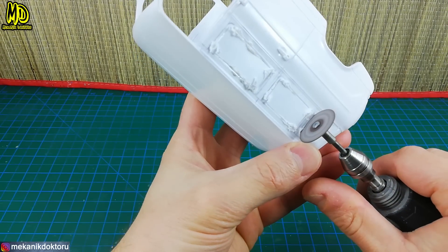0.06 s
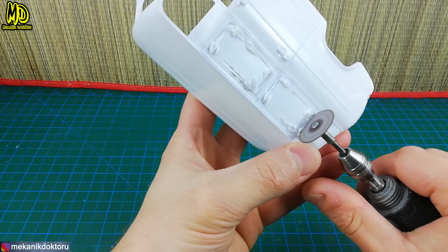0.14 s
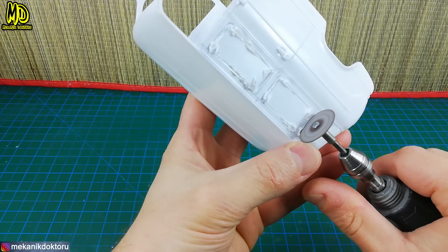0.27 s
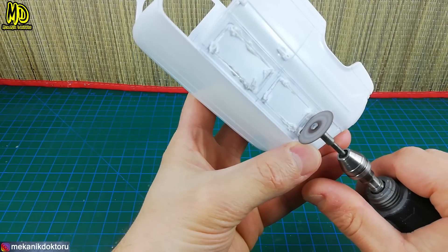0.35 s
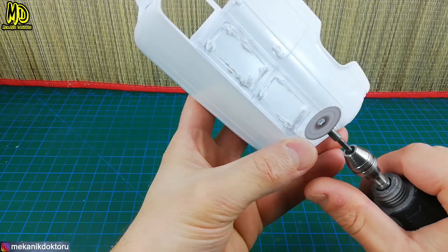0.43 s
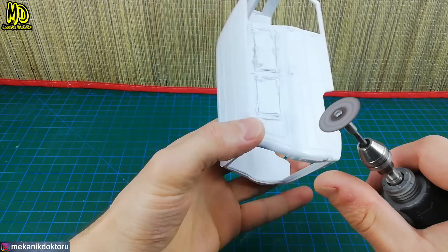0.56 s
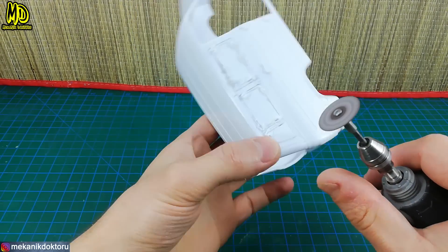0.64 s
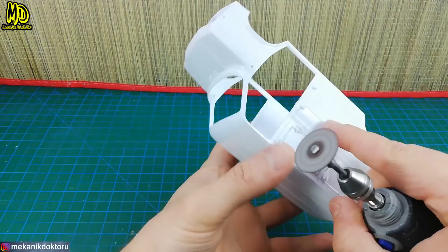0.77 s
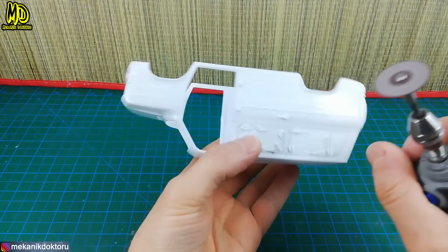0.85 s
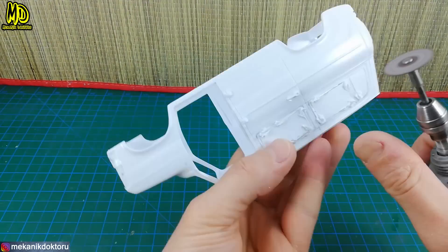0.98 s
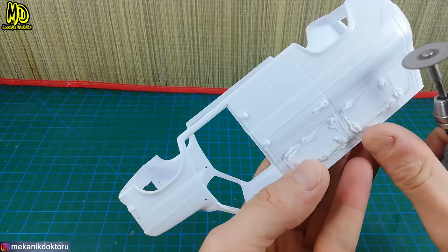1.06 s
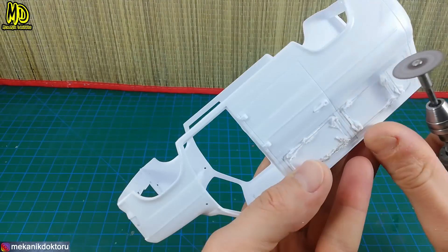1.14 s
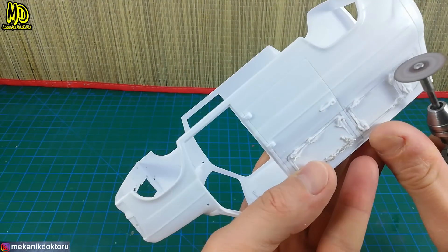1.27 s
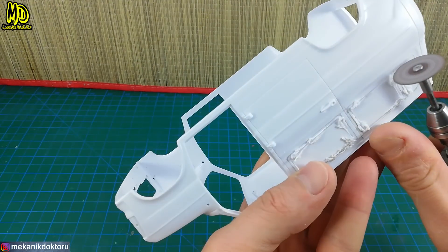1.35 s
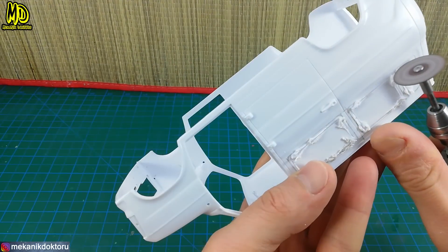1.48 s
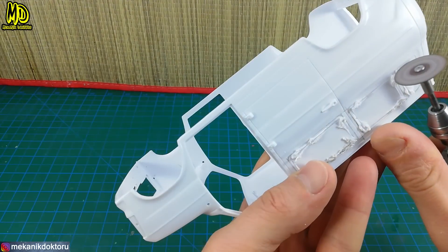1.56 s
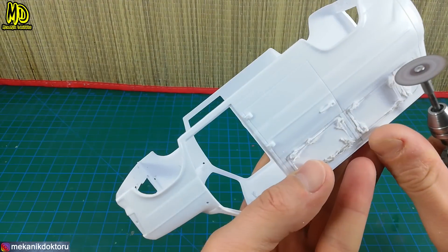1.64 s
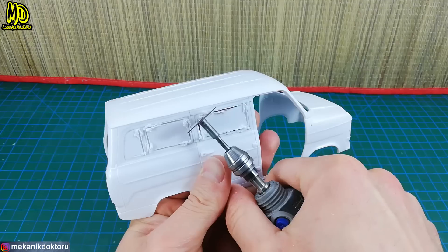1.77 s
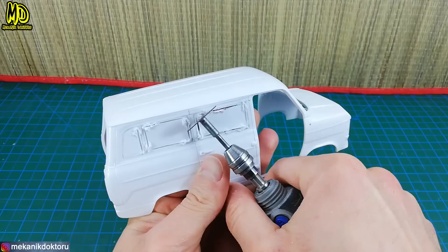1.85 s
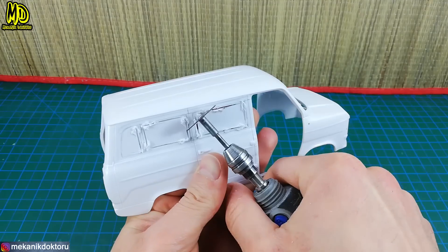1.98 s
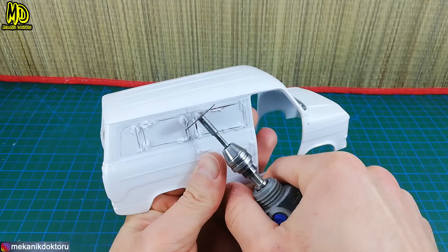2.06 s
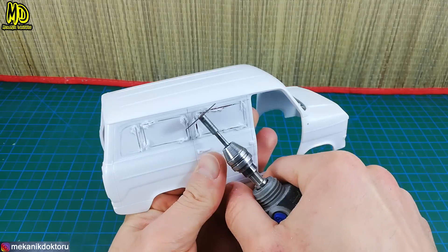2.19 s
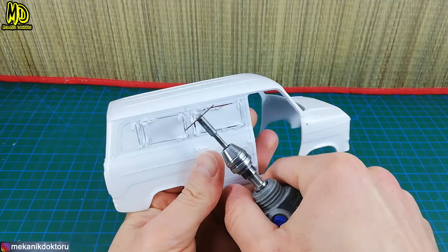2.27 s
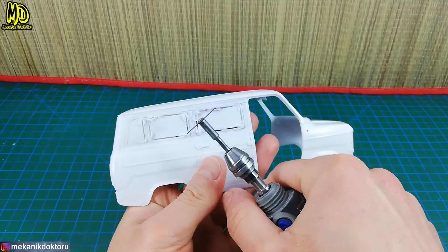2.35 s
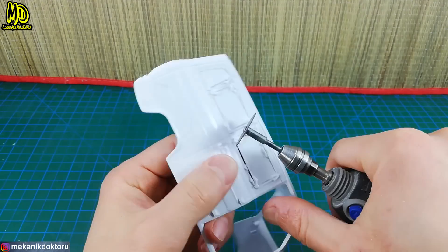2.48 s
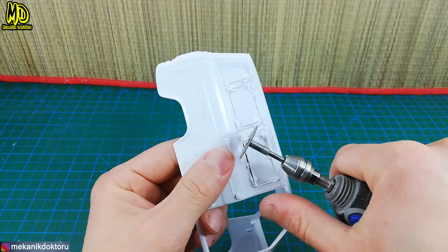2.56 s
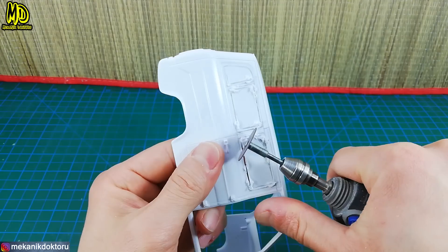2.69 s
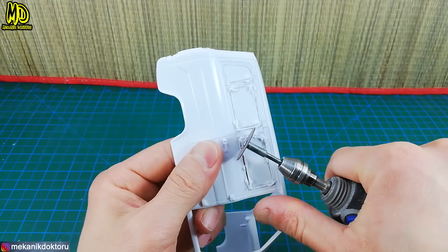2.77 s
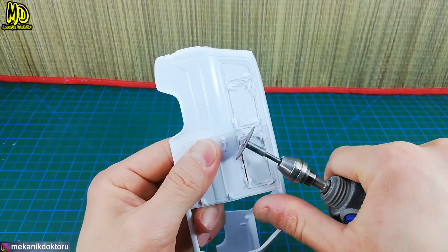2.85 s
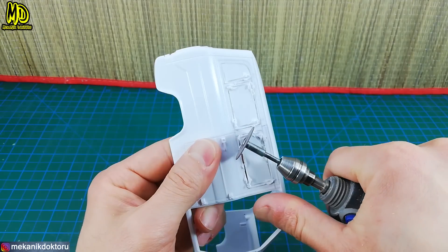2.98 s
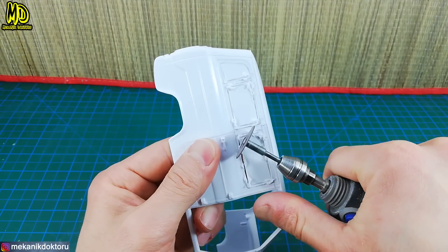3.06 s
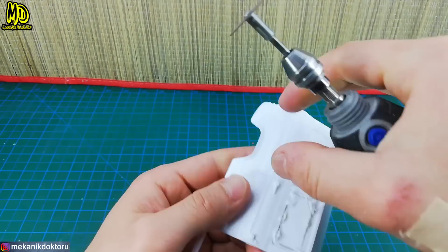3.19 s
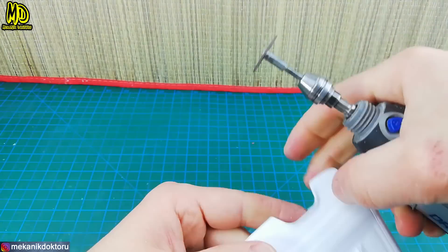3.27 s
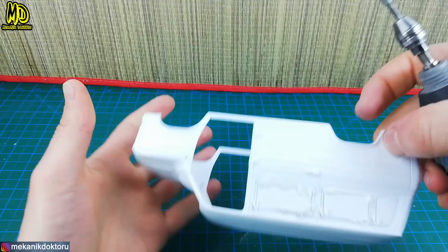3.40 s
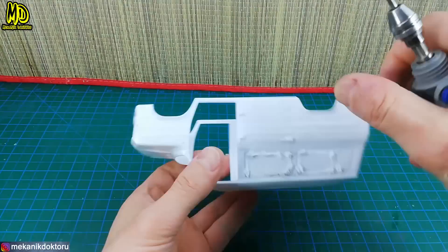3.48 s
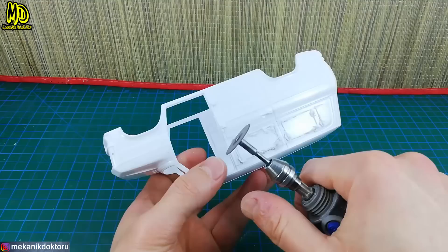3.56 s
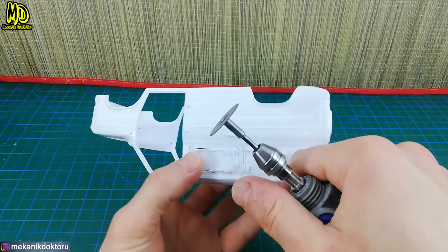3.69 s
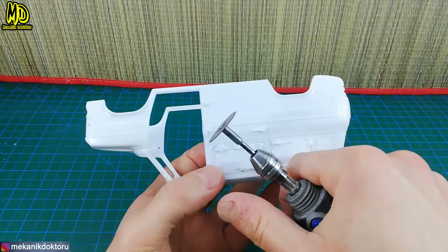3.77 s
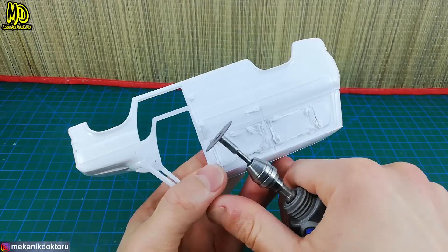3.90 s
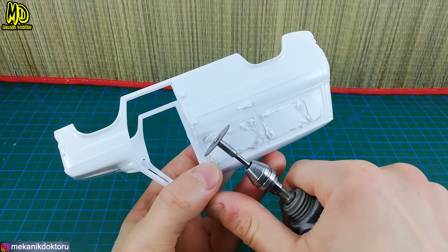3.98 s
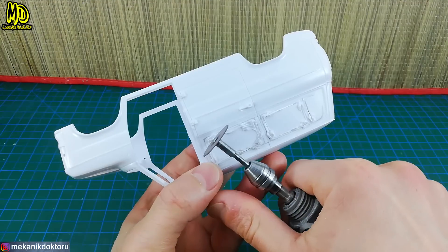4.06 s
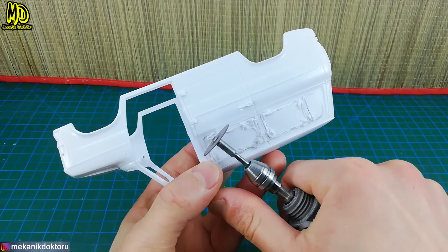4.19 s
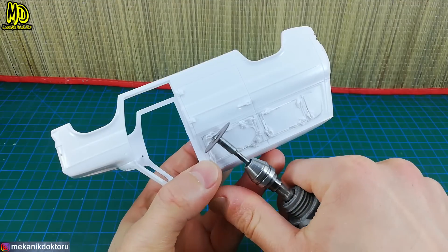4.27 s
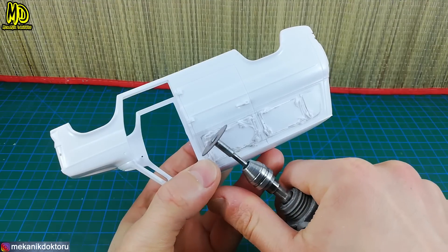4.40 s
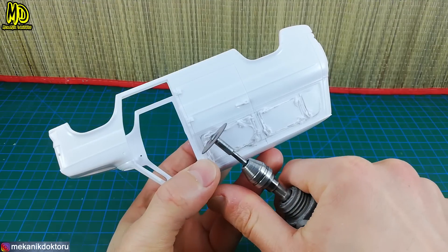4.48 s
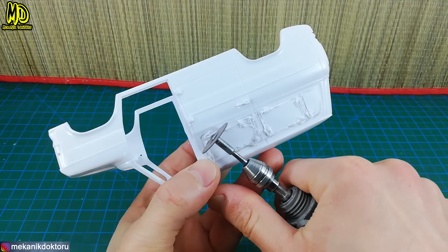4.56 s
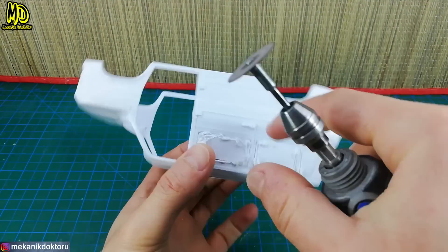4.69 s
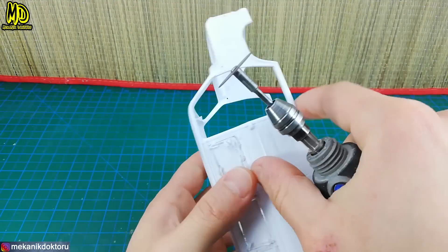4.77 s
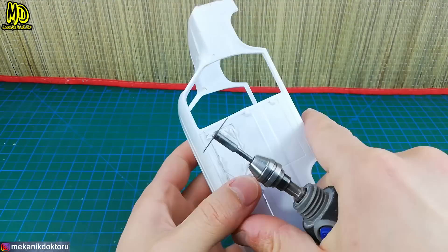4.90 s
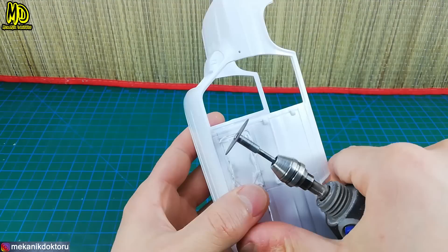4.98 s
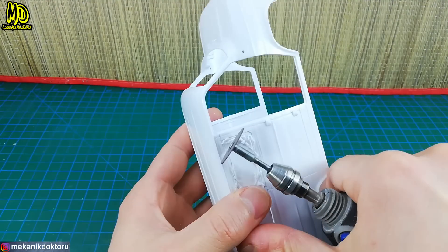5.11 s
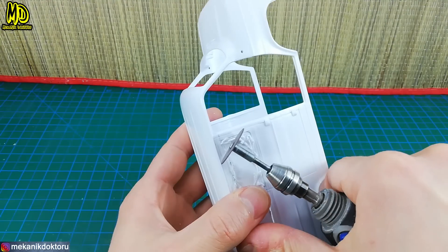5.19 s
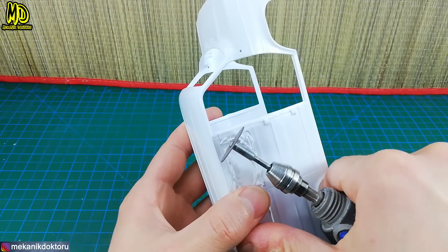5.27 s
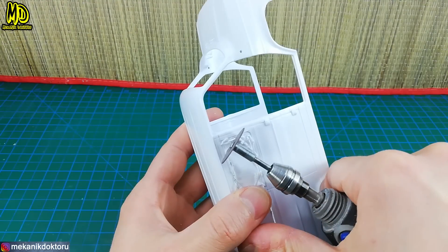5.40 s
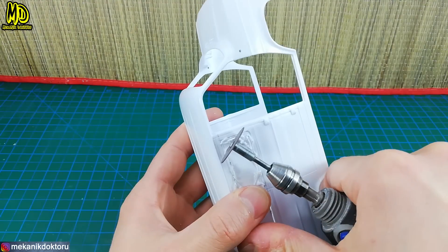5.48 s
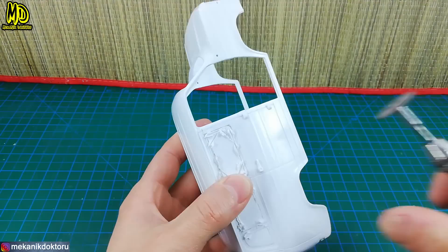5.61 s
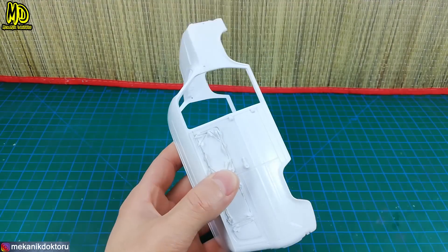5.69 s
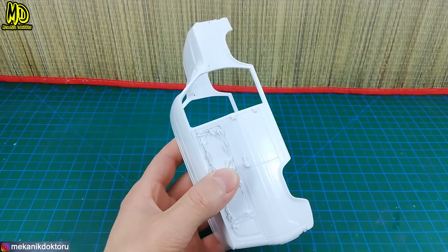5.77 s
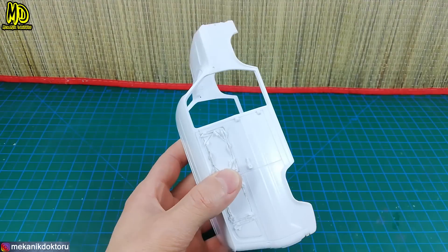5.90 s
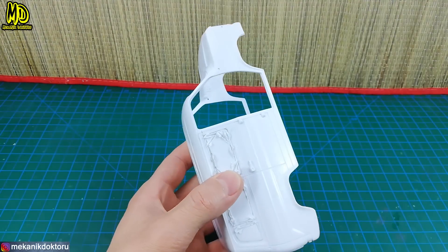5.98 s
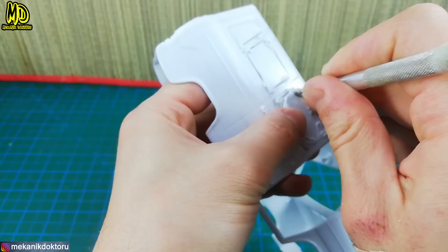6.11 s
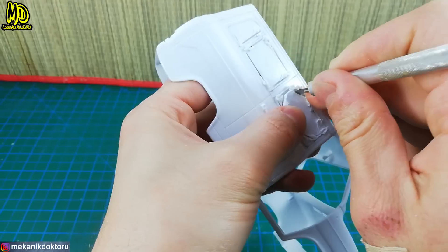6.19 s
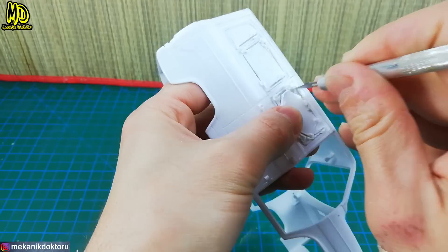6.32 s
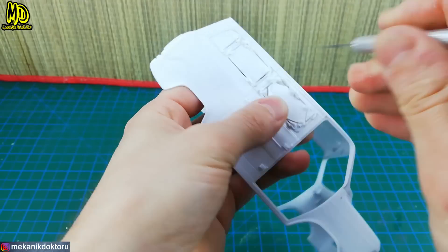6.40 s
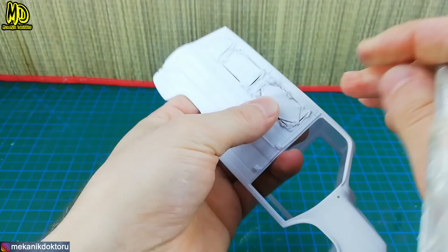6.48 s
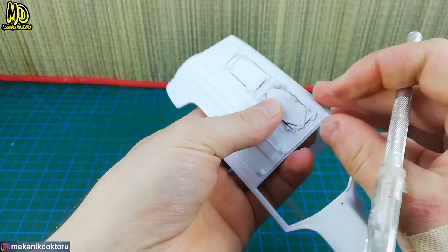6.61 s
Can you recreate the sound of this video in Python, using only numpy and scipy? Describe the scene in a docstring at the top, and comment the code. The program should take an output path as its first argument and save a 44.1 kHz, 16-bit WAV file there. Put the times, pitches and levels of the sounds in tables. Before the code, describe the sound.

Shrill handheld motor whine with gritty buzzing cuts into a thin plastic shell, a few light handling knocks, a quick run-down and a short blade scratch.

```python
"""Workbench: a handheld rotary tool cuts openings in a hollow plastic model body, on a fast, then a slower setting.
The motor is shaft-locked tones plus air and brush noise, the overtones pulsing with the chopped supply.
The disc is a once-per-turn pulse train through resonances; the load drags the speed down.
Modes, clack and tick make knocks as the shell is turned; grips are dull noise. The motor runs down,
then a knife stroke of dense slips and noise is heard over a low room rumble."""
import sys
import numpy as np
from scipy import signal
from scipy.fft import rfft, irfft, next_fast_len
from scipy.io import wavfile
from scipy.ndimage import uniform_filter1d

SR = 44100
rng = np.random.default_rng(int(sys.argv[2]) if len(sys.argv) > 2 else 0)


def file_out(sig):
    """Save sig as 16-bit WAV at sys.argv[1]."""
    # one column per channel
    cols = np.atleast_2d(sig).T
    # limit, then scale
    lim = np.clip(cols, -1, 1)
    pcm = np.round(lim * 32767).astype(np.int16)
    wavfile.write(sys.argv[1], SR, pcm)


N = 293265
T = np.arange(N) / SR

# start of the slow passage and of the knife work
SLOW_FROM_S, KNIFE_FROM_S = 1.798, 6.178
CHOPPER_HZ = 499.6
# pushes of the disc into the plastic; drag = speed lost if held, before hand wobble:
# [start/s, end/s, first drag/(turns/s), last drag/(turns/s), unbalance tone change/dB,
#  low/dB, middle/dB, high/dB, swell over the push/dB, chatter/0-1, panel ring f/Hz, panel level/dB]
PUSHES = [(0, 0.159, 496, 435, 2, -55, -48.5, -40.5, -4.5, 0.2, 6800, -48),
          (0.156, 0.399, 324, 156, -4.5, -61.5, -49.5, -46, -8.5, 0.5, 10200, -50),
          (0.412, 0.499, 92.5, 120, -5.5, -65, -55, -48, -2, 0.4, 14200, -64),
          (1.338, 1.383, 21, 6.8, -8, -59, -51.5, -48, -16, 0, 9700, -62),
          (1.5, 1.617, 40, 170, -6, -56.5, -48, -44.5, -8.5, 0.06, 4900, -70),
          (1.872, 1.941, 77, 300, -13, -68, -56, -54.5, 20, 0, 8200, -57),
          (1.947, 2.056, 361.5, 525, -2.5, -55.5, -52.5, -52.5, -4, 0.44, 1760, -60.5),
          (2.15, 2.296, 320.5, 689, 5.5, -59, -54.5, -57.5, 0.5, 0.33, 1750, -61.5),
          (2.764, 2.827, 81, 295, -16, -63, -53.5, -38.5, 1, 0, 4360, -59),
          (2.83, 2.929, 205.5, 780, -12, -55, -50.5, -39.5, -10, 0, 5900, -57.5),
          (2.979, 3.169, 211.5, 730, -11.5, -59.5, -52.5, -43.5, -3, 0, 8200, -58),
          (4.093, 4.134, 38, 94, -9, -68, -65, -49.5, -10, 0, 6900, -55),
          (4.161, 4.335, 63.5, 535, -9, -50, -43, -45, 2, 0, 2150, -59),
          (4.337, 4.437, 1032, 567, 7, -51.5, -45, -46.5, -2, 0.21, 8900, -51),
          (4.505, 4.599, 318.5, 740, -14.5, -54.5, -46, -45.5, 2, 0.08, 8900, -46.5),
          (4.604, 4.682, 480.5, 1086, 6, -55, -47.5, -49, -5.5, 0.2, 8900, -47.5),
          (5.206, 5.267, -0.5, 230, -14, -58, -51.5, -43.5, -1, 0.12, 5700, -56),
          (5.264, 5.367, 336, 570, -0.5, -59.5, -46.5, -49.5, -1, 0.12, 8900, -59),
          (5.366, 5.478, 293.5, 413, -0.5, -68, -59.5, -52, -7, 0, 8700, -55.5),
          (5.491, 5.631, 299, 460, -7, -76.5, -54, -53.5, 5, 0, 1700, -71.5)]
# tool's place between the ears: [t/s, left minus right/dB]
PLACE = [(0.0, -2.5), (0.73, -5), (0.98, -8), (1.32, -2.5), (3.02, 1), (3.21, -4), (3.26, 2), (4.15, -3.5),
         (4.84, -1), (6.1, -3.5)]


def from_db(db):
    """Decibels to gain."""
    return 10 ** (np.asarray(db) / 20)


def rms_one(x):
    """Scale to unit power."""
    return x / np.sqrt(np.mean(x ** 2) + 1e-20)


def in_time(rows):
    """Interpolate the columns of a breakpoint table at every sample."""
    s, *columns = np.transpose(rows)
    return [np.interp(T, s, c) for c in columns]


def during(start_s, end_s, edge_s):
    """Gate with linear ramps, half open at start and end."""
    return np.clip(np.minimum(T - start_s, end_s - T) / edge_s + .5, 0, 1)


def bumps(rows):
    """Sum of Gaussian bumps in time; rows of (centre/s, length/s, heights...)."""
    return sum(np.outer(heights, np.exp(-((T - s) / length) ** 2)) for s, length, *heights in rows)


def drift(rate_hz):
    """Random wander of rms 1: two-pole low-passed noise, computed every 40 samples."""
    r = np.exp(-80 * np.pi * rate_hz / SR)
    white = rng.standard_normal(N // 40 + 2002)
    slow = signal.lfilter([1], [1, -2 * r, r * r], white)[2000:]
    return np.interp(np.arange(N) / 40, np.arange(len(slow)), rms_one(slow))


def coloured(x, colour):
    """Shape a signal by a spectrum that falls 12 dB per octave beyond its ends; rms 1."""
    hz, db = np.transpose(colour)
    size = next_fast_len(N)
    f = np.maximum(np.arange(size // 2 + 1) * SR / size, 1)
    ends = np.minimum(1, np.minimum(f / hz[0], hz[-1] / f)) ** 2
    gain = from_db(np.interp(np.log(f), np.log(hz), db)) * ends
    return rms_one(irfft(rfft(x, size) * gain, size)[..., :N])


def noise(colour, side_db):
    """Coloured stereo noise: a shared mid plus an opposed side."""
    mid, side = coloured(rng.standard_normal((2, N)), colour)
    return mid + from_db(side_db) * side * [[1], [-1]]


def resonance(x, hz, width_hz):
    """Two-pole band-pass, peak gain 1."""
    r = np.exp(-np.pi * width_hz / SR)
    poles = [1, -2 * r * np.cos(2 * np.pi * hz / SR), r * r]
    return signal.lfilter(np.array([1, 0, -1]) * (1 - r * r) / 2, poles, x)


def ring(clicks, hz, t60_s):
    """A unit click starts a decaying sine of height 1."""
    r, w = from_db(-60 / (t60_s * SR)), 2 * np.pi * hz / SR
    return signal.lfilter([0, np.sin(w)], [1, -2 * r * np.cos(w), r * r], clicks + 1e-18)


def pan(db):
    """Left-minus-right balance as two gains."""
    return from_db(np.array([[.5], [-.5]]) * db)


def motor_speed():
    """The rotor lags its setting minus the cut's drag, first quickly, then creeping; it coasts once off."""
    # free speed that the motor settles to: [from t/s, speed/(turns/s)]
    settings = [(0, 1620), (1.798, 1114), (2.76, 1163)]
    fast_start, slow_start = 1413, 980  # turns/s at the start of each passage
    inertia_s, creep_s, creep_share = 0.109, .25, .328
    off_s, coast_s = 5.895, 0.205
    hand_wobble = 0.05  # rms share of the drag
    aim, pressure = np.zeros(N), 1 + hand_wobble * drift(20)
    for start, free in settings:
        aim[T >= start] = free
    for start, end, first, last, *_ in PUSHES:
        on = (T >= start) & (T < end)
        aim[on] -= pressure[on] * np.interp(T[on], [start, end], [first, last])

    def lag(x, time_s):
        """One-pole smoothing."""
        r = np.exp(-1 / (time_s * SR))
        return signal.lfilter([1 - r], [1, -r], x)

    def follow(first, wanted):
        """One passage, from its starting speed."""
        step = uniform_filter1d(wanted, size=800) - first  # load builds and eases smoothly
        return first + (1 - creep_share) * lag(step, inertia_s) + creep_share * lag(step, creep_s)

    fast = T < SLOW_FROM_S
    speed = np.concatenate([follow(fast_start, aim[fast]), follow(slow_start, aim[~fast])])
    return speed * np.exp(-np.maximum(T - off_s, 0) / coast_s)


def motor(speed, turns):
    """Unbalance tone, overtones, cooling air and brush sizzle grow with speed and vary with the tool's angle."""
    # commutator and bearing overtones per setting: [multiple of the speed, relative level/dB]
    fast_orders = [(2, -81.5), (3, -68), (4, -84), (5, -74), (6.1, -71.5), (8, -58)]
    slow_orders = [(2, -81), (2.55, -72), (3, -72), (7.65, -60), (8, -63.5), (8.1, -67.5), (11, -64.5),
                   (12, -68), (13, -63.5), (16, -40.5)]
    # noise spectra: [f/Hz, relative density/dB]
    air_colour = [(400, -36), (1200, -9.5), (2000, -4), (2600, -7), (4100, -5.5), (4900, 7.5), (5800, 3),
                  (6700, 2.5), (7400, 3.5), (8500, 1.5), (10200, 8), (16000, -47)]
    brush_colour = [(8000, -16), (10500, -9), (16000, -6.5)]
    # hand turns the tool to a new angle: [t/s, length/s, unbalance tone/dB, air/dB, brushes/dB,
    #  lower overtones/dB, highest overtones/dB]
    tool_turns = [(0.581, 0.32, 5.5, 2.5, 3, -1.5, 2.5), (0.825, 0.16, -7, 2, -3.5, -3, 1.5),
                  (0.987, 0.053, -1, -1, -5, -7, 3.5), (1.328, 0.5, 2, 2.5, 3.5, -1.5, -4.5),
                  (2.207, 0.2, -7, 2, 8.5, -4, -10), (3.385, 0.25, 5, 6, 3, -3.5, -2),
                  (3.83, 0.21, 1.5, 1.6, -3.5, 0.5, 3), (4.734, 0.14, -3.5, 5, 5, 1, 0),
                  (5.775, 0.13, 4, 2.5, 9.5, -22, -2)]
    reference_speed = 1150  # turns/s
    # whine, air, brushes, overtones: (level/dB at reference speed, dB per doubling of speed)
    laws = (-60.5, 15), (-59, 9.1), (-57.5, 6.9), (-3, 18.8)
    seat_s, scrape_flutter_db = 0.034, 2.0  # the cut takes hold of the tone, then makes it flutter
    damping_db, damping_s = -5, .04  # on the highest overtones

    doublings = np.log2(speed / reference_speed)
    whine_db, air_db, brush_db, lines_db = [db + slope * doublings for db, slope in laws]
    whine_turn, air_turn, brush_turn, *beam_db = bumps(tool_turns)
    fast, powered = T < SLOW_FROM_S, np.interp(T, [5.8, 5.95], [1, .3])

    flutter_db = scrape_flutter_db * drift(45)
    contact_db = sum((db + flutter_db) * during(start, end, seat_s) for start, end, _, _, db, *_ in PUSHES)
    whine_gain = from_db(whine_db + whine_turn + contact_db + 0.71 * drift(66))
    whine = np.sqrt(2) * whine_gain * np.sin(2 * np.pi * turns)
    # the ears hear the tone out of step: quadrature side part
    whine_side = from_db(-6.5) * drift(0.31) * np.gradient(whine) * SR / (2 * np.pi * speed)

    # plastic damps the highest overtones while the disc is in it
    touching = np.minimum(sum(during(start, end, damping_s) for start, end, *_ in PUSHES), 1)
    beam_db = (beam_db[0], beam_db[1] + damping_db * touching)
    fast_lines = overtones(fast_orders, speed, turns, beam_db, ripple=1.0, steepness=14.0,
                           jerk=1.6, slip_turns=.014, rough=0.02)
    slow_lines = overtones(slow_orders, speed, turns, beam_db, ripple=0.24, steepness=1.94,
                           jerk=1.36, slip_turns=.012, rough=0.023)
    lines = from_db(lines_db) * powered * np.where(fast, fast_lines, slow_lines)

    air = from_db(air_db + air_turn + 1.74 * drift(36)) * noise(air_colour, side_db=-5.5)
    brush = from_db(brush_db + brush_turn + 2.0 * drift(26)) * noise(brush_colour, side_db=3.5)
    brush = brush * np.where(fast, chopper(0.059), 1)
    stopping = np.interp(T, [6.04, KNIFE_FROM_S], [1, 0])
    placed = (lines + brush) * pan(in_time(PLACE)[0])
    return (whine + whine_side * [[1], [-1]] + air * pan(0.56) + placed) * stopping


def overtones(orders, speed, turns, beam_db, ripple, steepness, jerk, slip_turns, rough, spread=1.0):
    """Rough shaft-locked lines swell through housing resonances; high ones pulse most with the supply."""
    # tool housing resonances: [f/Hz, width/Hz, lift/dB]
    housing = [(3200, 700, 9), (9200, 700, 13), (12750, 1300, 7), (15800, 2000, -7)]
    out = 0
    slip = slip_turns * drift(60)
    burst = np.cos(2 * np.pi * CHOPPER_HZ * T)
    for multiple, db in orders:
        hz = multiple * speed
        lift_db = sum(lift / (1 + (2 * (hz - centre) / width) ** 2) for centre, width, lift in housing)
        # the highest lines beam in other directions than the lower ones
        beamed = np.interp(hz, [9500, 11500], [0, 1])
        angle_db = (1 - beamed) * beam_db[0] + beamed * beam_db[1]
        gain = from_db(db + lift_db + angle_db + 1.6 * drift(10)) * (hz < SR * .4)
        depth = min(ripple * (multiple / 8) ** steepness, 6)
        # supply bursts jerk the phase ahead
        phase = 2 * np.pi * multiple * (turns + slip) + jerk * depth * burst
        sine, cosine = np.sin(phase), np.cos(phase)
        # uneven brush contact: noise skirt, stronger on high lines
        skirt = rough * multiple * (drift(180) * sine + drift(290) * cosine)
        # paths to the two ears change as the hand moves
        side = spread * drift(0.78) * cosine
        out = out + np.sqrt(2) * gain * chopper(depth) * (sine + skirt + side * [[1], [-1]])
    return out


def chopper(depth):
    """The speed control feeds the motor in short bursts; power 1."""
    return rms_one(np.exp(depth * np.cos(2 * np.pi * CHOPPER_HZ * T)))


def cutting(speed, turns, grit, jitter_turns, wander_db, flutter_db, spread):
    """The disc's high spot strikes once a turn; strikes grow gritty and uneven as it bogs down."""
    # disc and shell resonances, one list each for low, middle, high: [f/Hz, width/Hz, relative level/dB]
    cut_modes = [
        [(1930, 910, -2), (2950, 220, 2.5), (3660, 790, 5.5), (4760, 1760, 5)],
        [(5650, 980, 3), (7080, 870, 10.5), (8390, 660, 5.5), (10070, 1030, 6)],
        [(11100, 1000, -2.5), (13160, 2800, 1.5), (14600, 1200, 9)],
    ]
    # disc catches and bites harder: [t/s, length/s, lift/dB]
    catches = [(1.506, 0.0082, 3), (2.839, 0.0082, 1.5), (2.888, 0.014, 5.5), (3.136, 0.015, 3.5),
               (4.225, 0.013, 1.5), (4.437, 0.0086, 3.5), (4.626, 0.02, 4), (5.209, 0.0063, 2.5),
               (5.274, 0.014, 5), (5.39, 0.005, 7.5), (5.415, 0.0034, 6), (5.443, 0.0075, 2.5)]
    panel_width_hz = 830
    gains, chatter, panel_hz = pushes()
    bog = np.clip((1080 - speed) / 350, .1, 1)
    angle = np.pi * (turns + jitter_turns * bog * drift(200))
    # band-limited pulse train, harmonics up to about 19000 Hz
    count = 2 * np.floor(19000 / speed) + 1
    strikes = np.sin(count * angle) / (np.sin(angle) + 1e-12) / np.sqrt(count)
    # chatter: every other turn bites deeper
    strikes = strikes * (1 + chatter * (1 + 0.11 * drift(2.5)) * np.cos(angle))
    force = strikes + grit * bog * np.cos(angle) ** 2 * rng.standard_normal(N)

    def answer(hz, width_hz):
        """One stereo resonance, delayed by the strikes' way through the shell."""
        late = np.roll(force, rng.integers(SR // 700))
        part = resonance(resonance(late, hz, width_hz), hz, 2 * width_hz)
        quadrature = np.gradient(part) / np.sin(2 * np.pi * hz / SR)
        return part + spread * drift(3.15) * quadrature * [[1], [-1]]

    # the contact point moves, so each resonance comes and goes
    parts = [sum(answer(hz, width_hz) * from_db(db + wander_db * drift(30.0)) for hz, width_hz, db in modes)
             for modes in cut_modes]
    parts.append(sum(answer(hz, panel_width_hz) * (panel_hz == hz) for hz in np.unique(panel_hz) if hz > 0))
    out = 0
    for part, gain in zip(parts, gains):
        # divide out the running rms so that the pushes set the level
        level = np.sqrt(np.abs(uniform_filter1d(part.mean(axis=0) ** 2, size=900)) + 1e-12)
        out = out + part / level * gain * from_db(flutter_db * drift(41))
    return out * from_db(bumps(catches)[0]) * pan(in_time(PLACE)[0])


def pushes():
    """Range and panel gains, chatter and panel pitch: pushes start a little softer, then shift in colour."""
    edge_s, onset_db, onset_s = 0.0068, -2.3, 0.025
    sink_db = (3.4, -1.3, 0.5, -2)  # low, middle, high, panel: change over a push as the disc sinks in
    gains, chatter, panel_hz = np.zeros((4, N)), np.zeros(N), np.zeros(N)
    for start, end, _, _, _, low_db, middle_db, high_db, swell_db, uneven, hz, panel_db in PUSHES:
        gate = during(start, end, edge_s)
        on = gate > 0
        age = T[on] - start
        along = age / (end - start) - .5
        shape_db = onset_db * np.exp(-age / onset_s) + swell_db * along
        levels_db = (low_db, middle_db, high_db, panel_db)
        gains[:, on] += gate[on] * from_db([db + shape_db + sink * along for db, sink in zip(levels_db, sink_db)])
        chatter[on] += gate[on] * np.clip(uneven, 0, 1)
        panel_hz[on] = hz
    return gains, chatter, panel_hz


def knocks(clack_s):
    """Each knock rings the hollow shell's modes under a dry clack and a bright tick."""
    # knocks on the shell, relative levels: [t/s, hollow/dB, clack/dB, tick/dB, tick decay/s]
    hits = [(2.507, -65.5, -69, -80, 0.014), (3.214, -85, -66.5, -56, 0.021), (3.237, -102, -78, -52, .003),
            (3.285, -86, -63, -54, .005), (3.322, -92, -63.5, -47.5, .004),
            (4.806, -72.5, -66.5, -72, 0.0086), (5.772, -62, -63.5, -58, 0.012),
            (6.054, -69, -65.5, -50.5, 0.014), (6.068, -95, -88, -57, 0.014), (6.086, -70, -70, -73, .008),
            (6.115, -67, -67, -62, 0.016)]
    # shell modes: [f/Hz, relative level/dB, t60/s]
    shell = [(257, -8, 0.21), (306.3, -4.5, 0.4), (441.3, -2, 0.12), (599.7, 9.5, 0.016),
             (1322, -19, 0.074)]
    # tick spectrum: [f/Hz, relative density/dB]
    tick_colour = [(3000, -19), (5200, 4), (7500, -7.5), (15000, -13)]
    clack_colour = [(150, -11.5), (1500, -8.0), (2400, -26)]
    at, hollow_db, clack_db, tick_db, tick_s = np.transpose(hits)
    index, body = np.round(at * SR).astype(int), np.zeros(N)
    for hz, db, t60_s in shell:
        clicks = np.zeros(N)
        height = from_db(hollow_db + db + 5.5 + rng.normal(0, 1, len(at)))
        clicks[index] = height * rng.choice([-1, 1], len(at))
        body += ring(clicks, hz, t60_s)
    # the knocks' ringing carries little below 175 Hz
    body = signal.sosfilt(signal.butter(2, 175, "high", fs=SR, output="sos"), body)

    def bursts(db, decay_s):
        """Envelopes that jump up at each knock and die away."""
        return sum(from_db(level) * (T >= s) * np.exp(-np.clip((T - s) / decay, 0, 20))
                   for s, level, decay in np.broadcast(at, db, decay_s))

    clack = bursts(clack_db + 8.0, clack_s) * noise(clack_colour, side_db=-13)
    tick = bursts(tick_db + 2.5, tick_s) * noise(tick_colour, side_db=2.5)
    return body + clack + tick


def fingers():
    """Dull rubs of skin on the shell: swells of low noise."""
    # fingers shifting their grip: [t/s, length/s, level/dB]
    grips = [(0.58, 0.081, -71.5), (1.042, 0.067, -64.5), (2.547, 0.025, -68)]
    # rub spectrum: [f/Hz, relative density/dB]
    grip_colour = [(140, 2.5), (280, 6.5), (700, -1)]
    swell = bumps([(s, length, from_db(db)) for s, length, db in grips])[0]
    return swell * noise(grip_colour, side_db=-16)


def knife(slips_per_s):
    """The blade chatters along the cut in dense small slips, with noise of the same colour."""
    # knife stroke envelope: [t/s, relative level/dB]
    stroke = [(6.349, -62), (6.355, -60), (6.38, -47.5), (6.394, -64), (6.45, -77)]
    # blade spectrum: [f/Hz, relative density/dB]
    knife_colour = [(1700, -6.5), (2300, 4), (2900, -8), (3800, -4.5), (5000, -8.5), (6800, -7.5),
                    (8500, -12), (16000, -7)]
    level_db, = in_time(stroke)
    slips = (rng.random(N) < slips_per_s / SR) * rng.standard_normal(N)
    chatter = 0.43 * coloured(slips, knife_colour) + 2.34 * noise(knife_colour, side_db=1)
    return from_db(level_db) * chatter * (T > stroke[0][0]) * (T < stroke[-1][0])


def workshop(x, t60_s, wet_db):
    """Short reflections from bench and walls: decaying noise, different on each side."""
    t = np.arange(SR // 4) / SR
    echoes = rng.standard_normal((2, len(t))) * from_db(-60 * t / t60_s) * (t > .002)
    echoes /= np.sqrt(np.sum(echoes ** 2, axis=1, keepdims=True))
    return x + from_db(wet_db) * signal.fftconvolve(x, echoes, axes=1)[:, :N]


def background():
    """Steady coloured noise under the tool, then rumble and hiss under the knife."""
    # spectra: [f/Hz, relative density/dB]
    quiet_colour = [(30, -4), (190, -11), (245, 2), (275, -10.5), (370, -2.5), (700, -5)]
    rumble_colour = [(25, -17), (114, -13.5), (400, -21.5), (850, -40)]
    hiss_colour = [(900, 1.5), (2300, 2.5), (16000, -2.5)]
    quiet = from_db(-79) * noise(quiet_colour, side_db=-17)
    rumble = from_db(-67) * noise(rumble_colour, side_db=-20)
    hiss = from_db(-68) * noise(hiss_colour, side_db=-4)
    return np.where(T < KNIFE_FROM_S, quiet, rumble + hiss)


def scene():
    """Tool, shell and knife in the room, over its background."""
    speed = motor_speed()
    turns = np.cumsum(speed) / SR
    cut = cutting(speed, turns, grit=0.079, jitter_turns=.0035, wander_db=6, flutter_db=2.2, spread=0.66)
    tool = motor(speed, turns) + cut
    hands = knocks(clack_s=0.011) + fingers() + knife(slips_per_s=1600)
    return workshop(tool + hands, t60_s=.12, wet_db=-12) + background()


def record(dry):
    """Steep elliptic low-pass at 15.8 kHz."""
    return signal.sosfilt(signal.ellip(12, .1, 80, 15800, fs=SR, output="sos"), dry)


dry = scene()
out = record(dry)
file_out(out)
```